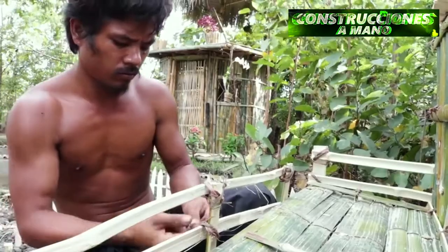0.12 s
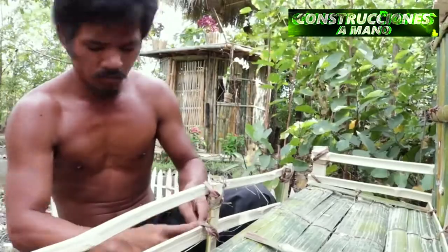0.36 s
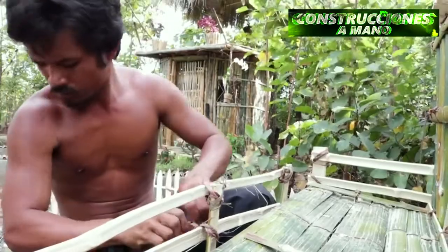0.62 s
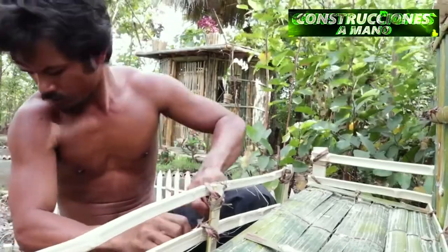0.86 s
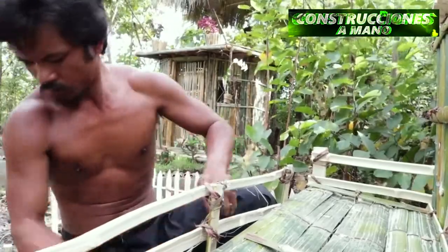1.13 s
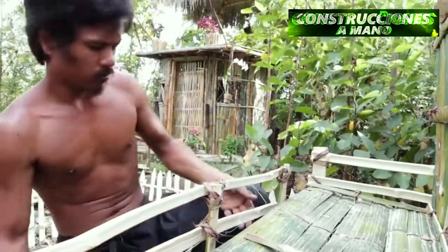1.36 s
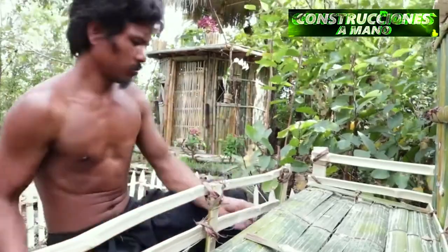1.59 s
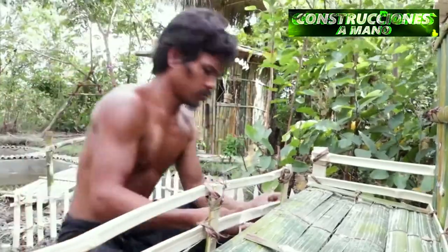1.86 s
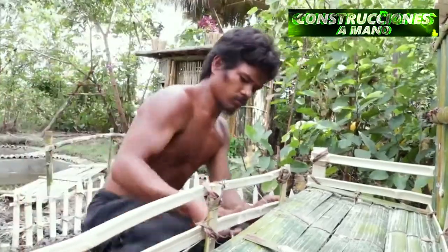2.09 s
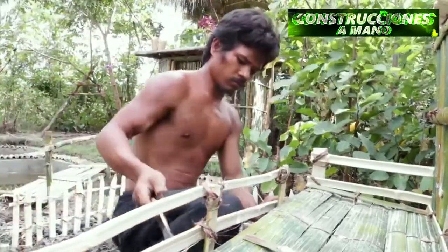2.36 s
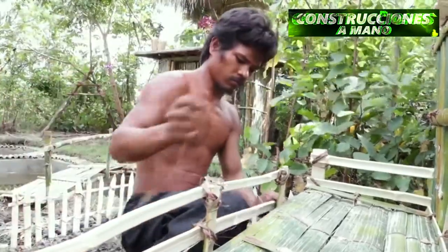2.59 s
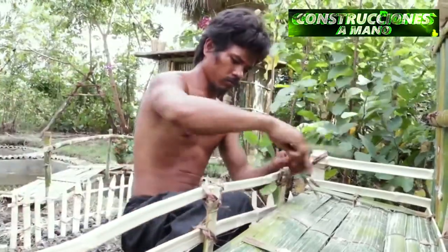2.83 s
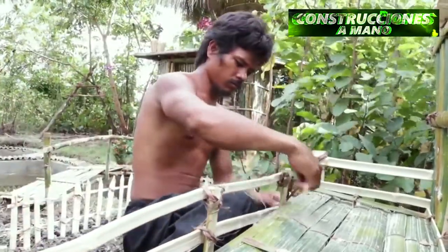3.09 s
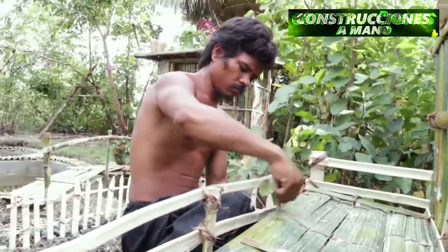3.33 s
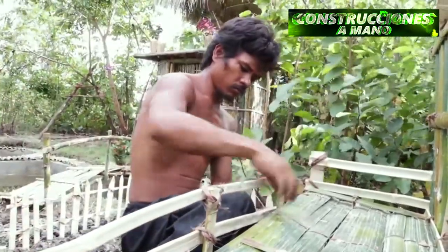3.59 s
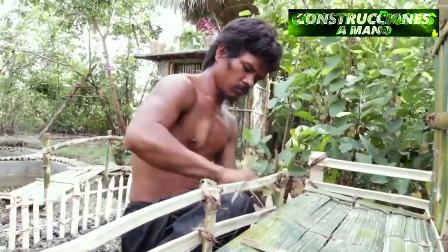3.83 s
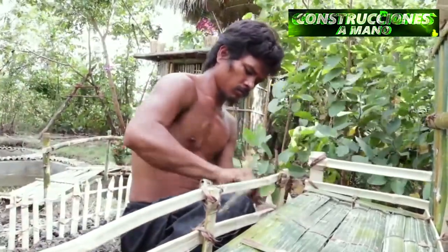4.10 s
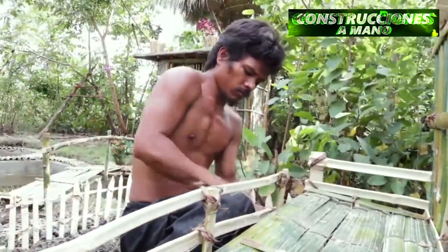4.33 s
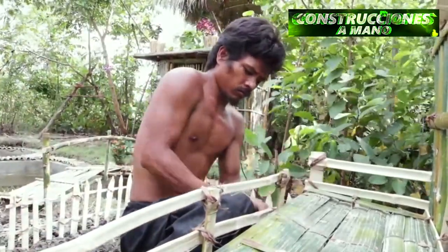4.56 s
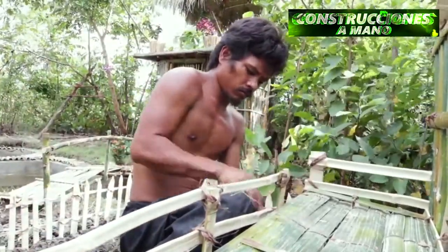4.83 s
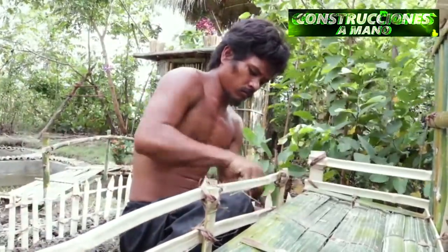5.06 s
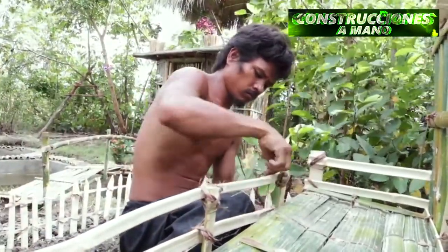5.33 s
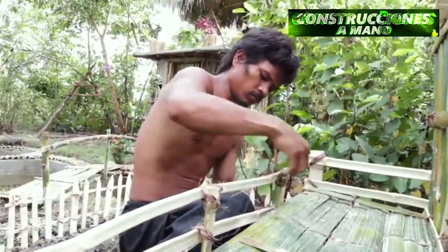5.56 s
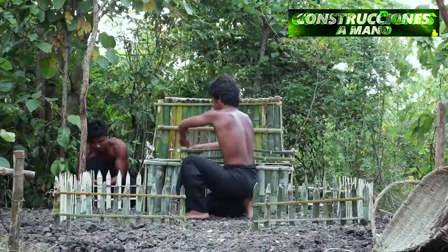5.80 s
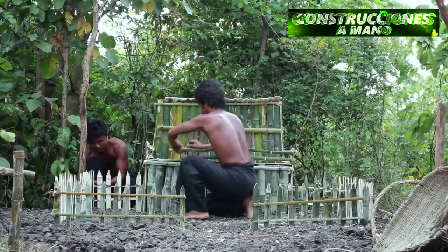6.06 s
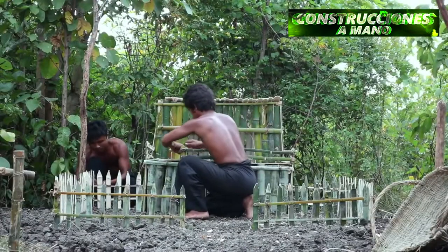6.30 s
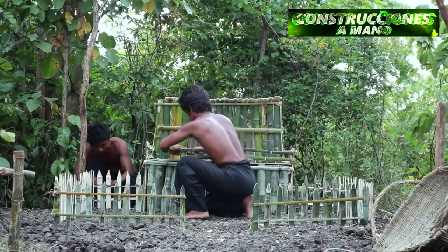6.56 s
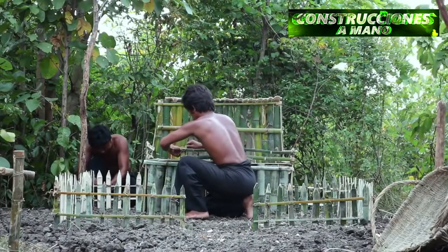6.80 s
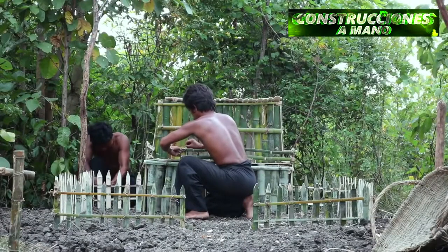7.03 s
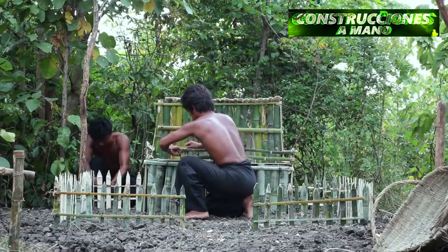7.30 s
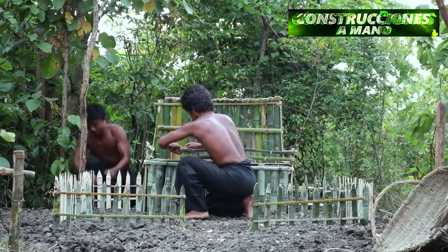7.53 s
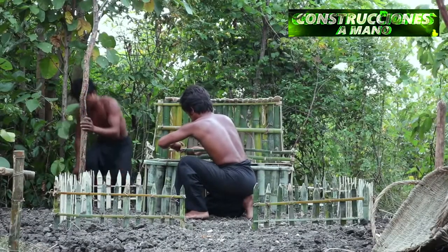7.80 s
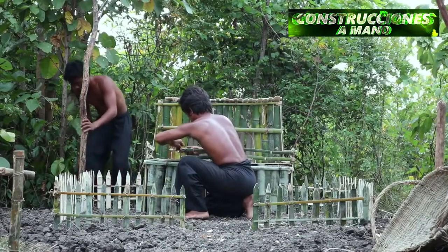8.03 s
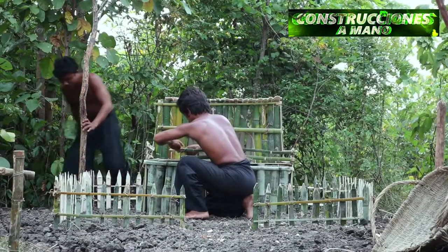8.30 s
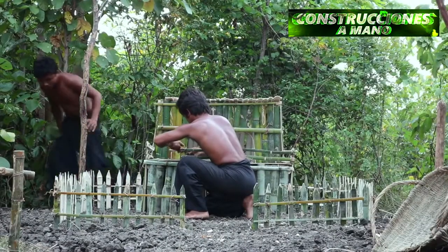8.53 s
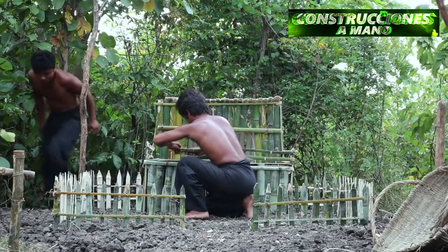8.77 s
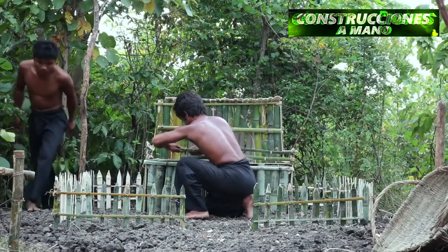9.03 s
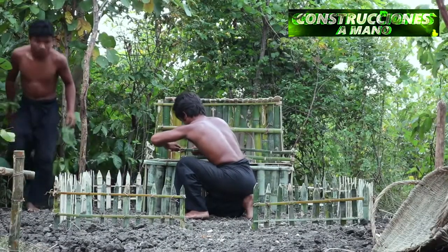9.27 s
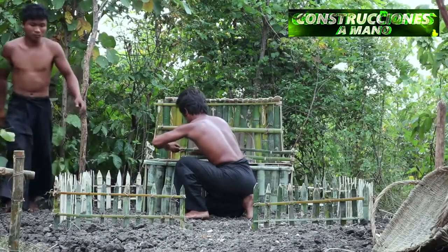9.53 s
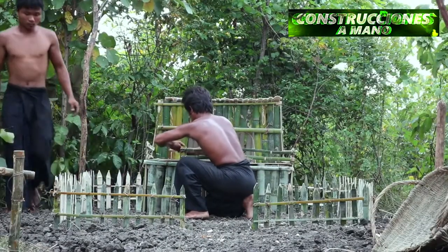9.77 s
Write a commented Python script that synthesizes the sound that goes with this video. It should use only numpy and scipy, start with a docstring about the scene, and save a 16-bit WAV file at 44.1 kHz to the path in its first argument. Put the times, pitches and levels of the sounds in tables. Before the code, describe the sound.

A clear, short bird whistle starts at once above a smooth, low, distant roar that lasts throughout. Sharp two-part chirps follow, with a dull bamboo knock near 0.2 s and downward swoops around 0.6 s. At about 0.9 s a rapid dry buzz sounds, then a falling trill at 1.2 s and small low dipping notes until 2 s. From 2 to 3.5 s it is sparser, with faint leaf rustles. Far echoing twitters thicken from 3.5 to 5.3 s, including thin high notes. A faint knock comes at 6.5 s. From 7 s birds grow busy again: bright hooks, a swoop, another knock at 8.3 s, a second buzz at 8.2 s and trill at 8.5 s. A thin steady note follows at 8.9 s, then tiny metal tinkles at 9.3 and 9.5 s among lively chirps. Soft wind bumps the microphone, notably near 0.7 and 5.8 s.

```python
"""A clear bird whistle comes first, over a far-off low roar, and soon many small birds sing round a forest clearing.
Each bird note is a near-pure tone with a faint octave; the deep ones are blurred by echoes, which are fading noise.
Two people work quietly nearby: dry leaves rustle (clicks), bamboo is knocked (thuds), metal tinkles (ringing tones).
Further birds twitter at random, the roar is shaped noise, and a light wind buffets the microphone below clear pitch."""
import sys
import numpy as np
from scipy import signal
from scipy.fft import rfft, irfft
from scipy.io import wavfile
from scipy.ndimage import uniform_filter1d, map_coordinates

SR = 44100
rng = np.random.default_rng(int(sys.argv[2]) if len(sys.argv) > 2 else 0)


def int16_out(signal):
    """Quantize to a 16-bit WAV file."""
    q = np.round(np.clip(np.atleast_2d(signal).T, -1, 1) * 32767)
    wavfile.write(sys.argv[1], SR, q.astype(np.int16))


def rack_gain(trim_db):
    """Turn a fader trim in dB into the linear factor to multiply a signal by."""
    fader = np.asarray(trim_db, float)
    return 10 ** (fader / 20)


N = 436149  # length of the scene in samples

# Levels in the tables are starting levels: breath, flicker, echo and the mix act on them later.
# Far roar, shape of its noise: (frequency [Hz], relative level [dB])
ROAR_SPECTRUM = [(25, -44), (50, 0), (255, -3.5), (590, -11.5), (850, -14), (1400, -24), (2200, -35),
                 (3500, -34.5), (5500, -41.5), (9000, -46.5), (13500, -51.5)]
# Slow change of the roar: (time [s], level [dB])
ROAR_SWELL = [(0, -36.5), (6.8, -35.5)]
# Wind buffets, shape of their noise: (frequency [Hz], relative level [dB])
WIND_SPECTRUM = [(3, -2.5), (15, 3), (33, -13), (65, -27), (400, -110)]
# Wind coming and going: (time [s], level [dB])
WIND_LEVELS = [(0, -22), (.5, -28.5), (.62, -10), (1.0, -13.5), (1.2, -26.5), (1.8, -40), (2.0, -20.5),
               (2.2, -37.5), (2.45, -18.5), (3.4, -20), (5.5, -22), (5.8, -12), (6.0, -27), (7.2, -31),
               (9.89, -37)]

# Hoarse far chatter: (start [s], length [s], first pitch [Hz], last pitch [Hz], level [dB])
CHATTER = [(0.435, 0.1, 5500, 6270, -45), (3.152, 0.069, 6200, 4500, -51), (5.258, .05, 5400, 6200, -47),
           (6.66, 0.024, 5600, 6180, -47.5), (8.67, 0.06, 6500, 5280, -47), (9.46, 0.051, 5600, 6050, -51)]
# Shape of a two-voiced churr: (time from start [s], pitch [Hz])
CHURR = [(0, 6170), (.027, 8060), (0.088, 7300), (0.144, 4860)]
# Calls of the churr: (start [s], level [dB])
CHURR_CALLS = [(2.885, -52.5), (3.056, -58)]
HOARSE = 0.055  # typical pitch shake in hoarse notes, as a share of the pitch

# Leaf rustles: (start [s], fading time [s], level [dB], guide frequency of the band [Hz])
RUSTLES = [(2.27, 0.044, -60, 5030), (2.66, 0.023, -53, 4960), (3.277, 0.046, -49, 4300),
           (4.27, 0.11, -63, 8400), (7.07, 0.03, -55, 2250), (7.773, 0.16, -59, 6700)]
CRISP_DB = 3.2  # spread of click sizes in a rustle [dB]
# Dull knocks on bamboo: (start [s], level [dB])
KNOCKS = [(0.179, -37.5), (6.484, -45), (8.299, -40.5)]
KNOCK_LOW_HZ, KNOCK_HIGH_HZ, KNOCK_FADE_S = 400, 2600, 0.03  # the body's band and fading time
# Ringing tones of the small metal piece: (frequency [Hz], relative level [dB], time to fall 60 dB [s])
METAL_MODES = [(8800, -6, 0.16), (10050, -10, 0.15), (11300, -8, 0.14), (12670, -1, 0.1), (13040, -6, 0.13)]
# Tinkles of the metal: (start [s], level [dB])
TINKLES = [(9.314, -43), (9.54, -52)]

# Buzzes, tiny falls in quick succession: (start [s], length [s], level [dB])
BUZZES = [(0.889, 0.24, -34), (8.197, .22, -34)]
BUZZ_RATE_HZ = 125  # average number of strokes per second
BUZZ_TOP_HZ, BUZZ_LOW_HZ = 5500, 3400  # pitch range of a stroke at the start of a buzz

# First part of a call, a peaked chip: (time from the chip's peak [s], pitch [Hz])
CHIP = [(-.019, 3900), (0, 5410), (0.019, 3600)]
# Second part, a short upstroke: (time from the chip's peak [s], pitch [Hz])
UPSTROKE = [(.071, 3212), (0.098, 4510), (0.111, 3460)]
# Two-part calls: (chip peak time [s], chip level [dB], upstroke level [dB])
CHIP_CALLS = [(0.107, -40, -37), (0.748, -33, -35), (1.666, -43, -46), (2.333, -45, -49),
              (4.083, -43.5, -42), (4.712, -43, -48), (5.72, -45.5, -50.5), (6.474, -41, -43.5),
              (7.241, -37.5, -45.5), (7.97, -36, -40)]
# Steep fall repeated in a trill: (time from start [s], pitch [Hz])
FALL = [(0, 6800), (0.031, 3200)]
# Notes of the trills: (start [s], level [dB])
TRILL = [(1.195, -43.5), (1.253, -42), (1.312, -46.5), (1.367, -49), (1.436, -51), (8.47, -40.5),
         (8.522, -39.5), (8.577, -45.5), (8.638, -44.5)]

# Depth among the trees: 0 close, 1 near, 2 far and beyond.
# Typical pitch trembling at depths 0, 1 and 2: (share of the pitch)
TREMBLE = (0.004, 0.01, 0.027)
# Straight slides and held notes: (start [s], length [s], first pitch [Hz], last pitch [Hz], level [dB], depth)
SLIDES = [(0.049, 0.12, 3660, 3420, -39, 0.13), (0.062, 0.03, 3190, 2340, -49, 1.9),
          (0.144, 0.096, 5900, 7060, -58, 1.55), (0.245, 0.073, 4900, 3750, -37.5, .3),
          (0.555, 0.051, 4900, 4940, -52, 0.76), (0.93, 0.048, 3470, 2705, -39.5, 1.8),
          (1.392, .025, 3010, 2350, -62, 0.44), (1.751, .024, 2900, 2280, -62, 0.54),
          (2.589, 0.026, 2690, 2830, -55, 0.091), (2.843, 0.037, 3140, 3100, -62, 0.11),
          (3.524, 0.067, 4730, 3970, -60, 2.3), (3.299, 0.023, 3300, 4690, -49, 1.4),
          (3.624, 0.031, 3670, 2270, -49.5, 2.6), (3.66, 0.062, 3170, 2290, -44, 1.4),
          (3.854, 0.058, 3700, 3610, -52.5, 1.2), (3.99, 0.087, 3590, 3980, -49, 1.6),
          (4.091, 0.039, 2030, 3280, -47, 2.03), (4.119, 0.028, 3210, 4440, -47, 2.2),
          (4.149, 0.022, 6030, 7040, -50.5, 1.4), (4.279, 0.049, 4700, 7450, -57, 1.5),
          (4.305, 0.047, 5370, 6200, -63, 1.2), (4.32, 0.062, 4250, 4490, -51.5, 1.4),
          (4.289, 0.037, 2820, 3555, -46.5, 1.7), (4.557, 0.22, 5970, 5960, -54, 1.65),
          (4.691, 0.053, 1926, 2360, -48.5, 1.8), (4.72, 0.042, 8600, 8500, -57.5, 1.1),
          (4.766, 0.045, 8550, 7800, -57, 1.4), (4.79, 0.041, 7600, 7700, -55, 1.4),
          (5.197, 0.027, 2760, 1910, -51, 2.4), (5.205, 0.033, 3440, 2734, -45.5, 1.8),
          (5.942, 0.06, 3470, 2700, -63, 1.2), (6.114, 0.085, 5860, 4250, -60, 1.3),
          (6.115, 0.081, 3730, 3650, -53, 2), (6.383, 0.091, 5260, 5100, -61, 0.072),
          (6.659, 0.041, 2320, 4310, -54, 0.88), (6.686, .04, 7900, 8250, -56, 1.4),
          (6.691, 0.054, 3990, 4080, -43, 1.45), (7.369, 0.099, 3710, 3400, -45.5, 0.37),
          (7.437, 0.081, 3615, 3660, -53, 0.8), (7.549, 0.083, 5170, 3450, -42.5, 1),
          (7.826, 0.031, 2810, 4730, -52, 0.49), (7.853, 0.041, 4520, 4060, -40.5, 1.5),
          (7.878, 0.11, 4090, 4500, -43.5, 1.2), (8.009, 0.024, 6700, 7300, -56, 1.3),
          (8.04, 0.1, 6750, 5600, -57, 1.3), (8.149, 0.072, 3070, 2274, -49, 2.4),
          (8.188, 0.056, 3260, 2485, -44.5, 1.14), (8.681, 0.038, 3700, 2620, -45, 1),
          (8.693, 0.096, 3560, 4010, -49.5, 1.2), (8.728, 0.089, 1934, 2824, -48, 1.56),
          (8.901, 0.06, 2680, 2720, -54, 0.74), (8.882, 0.026, 3740, 4520, -47, 2),
          (8.992, 0.039, 3420, 2680, -51.5, 1.7), (9.2, 0.034, 3690, 3870, -41.5, 2.3),
          (9.296, 0.042, 4440, 3944, -38.5, 1), (9.439, 0.11, 2360, 2480, -57, 0),
          (9.484, 0.04, 4300, 5250, -46, 1.77), (9.511, .05, 4310, 2440, -43.5, 1.8),
          (9.583, 0.025, 3310, 4640, -49, 1.8), (9.56, 0.13, 2500, 2376, -49.5, 2.07)]
# Hooks leap at once, then settle: (start [s], length [s], first pitch [Hz], settling pitch [Hz], level [dB], depth)
HOOKS = [(0.125, 0.045, 3690, 2850, -41, 1.1), (0.298, 0.073, 4100, 2690, -51, 0.65),
         (0.996, 0.058, 7600, 4750, -37, 0.058), (2.93, 0.055, 7100, 4930, -54, 0),
         (3.941, 0.056, 3140, 4410, -52.5, 2), (4.087, 0.038, 7700, 5250, -47, 2.04),
         (5.138, 0.073, 5700, 2820, -43, 1.24), (5.325, 0.064, 8750, 4960, -40.5, 0.46),
         (7.144, 0.056, 6770, 5090, -44, 1), (7.534, 0.057, 8300, 4990, -40, 0),
         (9.163, 0.044, 4800, 2910, -40, 1.9), (9.272, 0.054, 3600, 4750, -35.5, 1.23)]
HOOK_SETTLE = .19  # settling time constant as a share of the length
# Arches rise to a top and fall back: (start [s], length [s], foot pitch [Hz], top pitch [Hz], level [dB], depth)
ARCHES = [(0.172, 0.041, 3410, 4370, -47, 1.7), (2.61, 0.078, 2980, 4900, -56.5, 0.24),
          (2.614, 0.061, 3280, 4000, -56, 0.31), (3.2, 0.047, 3640, 4530, -51, 1.4),
          (5.309, 0.07, 3590, 4370, -54, 0.2), (8.779, 0.042, 3970, 5190, -44.5, 2)]
# Shape of a low dip: (time from start [s], pitch [Hz])
LOW_DIP = [(0, 2357), (.029, 1990), (.035, 2074), (.05, 2650)]
# A second, flatter voice under the bottom of the dip: (time from the dip's start [s], pitch [Hz])
UNDERTONE = [(.018, 1780), (.042, 1850)]
# Calls of the low dip: (start [s], dip level [dB], undertone level [dB])
LOW_DIP_CALLS = [(.962, -55, -64), (1.066, -47, -46), (1.182, -54, -56), (1.409, -50, -55),
                 (1.523, -55, -50), (1.772, -51, -47), (1.905, -51, -54)]
# Shapes of the other repeated motifs, each: (time from start [s], pitch [Hz])
RISE = [(0, 3810), (.055, 4263), (.113, 4310)]
SWOOP = [(0, 6590), (.04, 6320), (.12, 4560), (.165, 3850), (.222, 3430)]
VEE = [(0, 7350), (.012, 6280), (.054, 5420), (.089, 6900)]
SCOOP = [(0, 3800), (.035, 2342), (.071, 2600)]
LONG_FALL = [(0, 3660), (.07, 4260), (.128, 3620), (.158, 2810), (.27, 2190)]
# Their calls, each: (start [s], level [dB])
RISE_CALLS = [(0.421, -36), (7.741, -37.5)]
SWOOP_CALLS = [(0.612, -38.5), (7.922, -39.5)]
VEE_CALLS = [(8.802, -51), (9.093, -51)]
SCOOP_CALLS = [(0.486, -44.5), (4.177, -51.5), (4.607, -47)]
LONG_FALL_CALLS = [(.532, -50)]
# Thin steady notes with a clear octave: (start [s], length [s], level [dB])
STEADY = [(1.142, 0.15, -48.5), (8.91, 0.31, -49)]
STEADY_HZ, STEADY_OCTAVE_DB = 4250, -17  # pitch, and octave relative to it
SWELL = .32  # the smaller, the more abruptly a note starts and stops


def walk(rate):
    """Random wandering: values held for 1 / rate seconds and smoothed twice, with a spread near 1."""
    hold = int(SR / rate)
    held = rng.standard_normal(N // 100)[np.arange(N) // hold]
    return 1.595 * uniform_filter1d(uniform_filter1d(held, hold), hold)


def unit(x):
    """Scale a sound to an rms strength of 1."""
    return x / np.sqrt(np.mean(x ** 2))


def band(x, low_hz, high_hz, order=2):
    """Keep the frequencies between two limits."""
    limits = [low_hz, min(high_hz, .45 * SR)]
    return signal.sosfilt(signal.butter(order, limits, "band", fs=SR, output="sos"), x)


def add(track, start_s, sound):
    """Mix a sound into a track at a given time."""
    i = int(start_s * SR)
    track[..., i:i + sound.shape[-1]] += sound[..., :N - i]


def coloured(points):
    """Noise with a given balance of frequencies, rms 1."""
    hz, db = np.transpose(points)
    bins = np.arange(N // 2 + 1) * SR / N + 1
    gain = rack_gain(np.interp(np.log(bins), np.log(hz), db))
    return unit(irfft(rfft(rng.standard_normal(N)) * gain, N))


def curve(rows):
    """Turn a table of levels into a gain that changes over time."""
    s, db = np.transpose(rows)
    return rack_gain(np.interp(np.arange(N) / SR, s, db))


def voice(hz, db, overtone_db=-42):
    """The syrinx, a bird's voice organ: a near sine with a weaker octave."""
    phase = 2 * np.pi * np.cumsum(hz) / SR
    tone = np.sin(phase) + rack_gain(overtone_db) * np.sin(2 * phase)
    return np.sqrt(2) * rack_gain(db) * tone


def whistle(track, db, s, hz, tremble, place=0.5, overtone_db=-39, slide=4.8):
    """One note: the pitch rounds its turns and trembles, the breath swells and fades."""
    t = np.arange(s[0], s[-1], 1 / SR)
    log_pitch = np.interp(t, s, np.log(hz))
    tune = uniform_filter1d(log_pitch, len(t) // 8 + 1, mode="nearest")
    # fast slides take more breath than held notes; a larger slide value weakens this
    push = (1 + np.abs(np.gradient(tune)) * SR / slide) ** 0.38
    pitch = np.exp(tune + tremble[int(s[0] * SR):][:len(t)])
    breath = push * np.hanning(len(t)) ** SWELL
    add(track, s[0], place * voice(pitch, db, overtone_db) * breath)


def trunks(x, early_s, early_db, late_s, late_db):
    """Scattering: near branches give a short smear, countless trunks a long tail that loses its treble first."""
    t = np.arange(int(1.5 * SR)) / SR
    early, late = rng.standard_normal((2, len(t)))
    early = early * rack_gain(-60 * t / early_s)
    late = late * (1 - np.exp(-t / 0.007))
    middle = band(late, 2100, 4040, order=1) * rack_gain(-60 * t / late_s)
    treble = band(late, 5400, 13000, order=1) * rack_gain(-60 * t / (0.38 * late_s))
    tail = rack_gain(early_db) * unit(early) + rack_gain(late_db) * unit(middle + treble)
    return signal.fftconvolve(x, tail / np.sqrt(len(t)))[:N]


def roar():
    """Smooth distant noise, heavy in the bass, swelling a little."""
    return coloured(ROAR_SPECTRUM) * curve(ROAR_SWELL) * rack_gain(.5 * walk(1.295))


def wind():
    """Slow pressure swings at the microphone, rising and falling with the gusts."""
    return coloured(WIND_SPECTRUM) * curve(WIND_LEVELS)


def chorus(count=70):
    """Unseen birds far away: short slides at random moments and pitches."""
    track, tremble = np.zeros(N), 0.028 * walk(400)
    for when, length, pitch, slide, size in rng.random((count, 5)):
        start = when * (N / SR - .2)
        s = np.array([start, start + 0.0254 + 0.04 * length])
        first_hz = 2600 * 2 ** (1.1 * pitch)
        last_hz = first_hz * 2 ** (.2 - 0.73 * slide)
        whistle(track, -69 + 9 * size, s, [first_hz, last_hz], tremble)
    return track


def chatterers():
    """Distant hoarse notes whose pitch shakes widely."""
    track, tremble = np.zeros(N), HOARSE * walk(400)
    for s, length, first_hz, last_hz, db in CHATTER:
        whistle(track, db, [s, s + length], [first_hz, last_hz], tremble)
    dt, hz = np.transpose(CHURR)
    for s, db in CHURR_CALLS:
        # both sides of the syrinx sound, each with its own trembling
        whistle(track, db, s + dt, hz, tremble)
        whistle(track, db, s + dt, hz * .78, tremble[::-1])
    return track


def rustles(track, t):
    """Dry leaves: fading showers of uneven clicks."""
    for s, fade, db, hz in RUSTLES:
        clicks = rng.standard_normal(len(t)) * rack_gain(CRISP_DB * rng.exponential(size=len(t)))
        shower = unit(band(clicks, hz / 2, hz * 1.3))
        shape = np.minimum(t / 0.0024, 1) * np.exp(-(t / fade) ** 2)
        add(track, s, rack_gain(db) * shower * shape)


def knocks(track, t):
    """Bamboo: short broad thuds with a quick start and a smooth fade."""
    for s, db in KNOCKS:
        body = unit(band(rng.standard_normal(len(t)), KNOCK_LOW_HZ, KNOCK_HIGH_HZ))
        shape = np.minimum(t / 0.001, 1) * np.exp(-t / KNOCK_FADE_S)
        add(track, s, rack_gain(db) * body * shape)


def tinkles(track, t):
    """Metal: several fixed tones ring and fade together."""
    ring = sum(rack_gain(db - 60 * t / t60) * np.sin(2 * np.pi * hz * t) for hz, db, t60 in METAL_MODES)
    for s, db in TINKLES:
        add(track, s, rack_gain(db) * ring * np.minimum(t / 0.024, 1) ** 2)


def handling():
    """The quiet work of the two people: leaves, bamboo and metal together."""
    track, t = np.zeros(N), np.arange(SR // 4) / SR
    rustles(track, t)
    knocks(track, t)
    tinkles(track, t)
    return track


def buzzer():
    """Each stroke of the buzz slides down, loudest near its top; the buzz tires towards its end."""
    track = np.zeros(N)
    for s, length, db in BUZZES:
        t = np.arange(int(length * SR)) / SR
        rate = BUZZ_RATE_HZ * (1 + 0.06 * walk(55)[:len(t)])
        stroke = np.cumsum(rate / SR) % 1  # runs from 0 to 1 in each stroke
        puff = np.sin(np.pi * stroke ** 0.66) ** 2
        pitch = BUZZ_TOP_HZ + (BUZZ_LOW_HZ - BUZZ_TOP_HZ) * stroke ** 2
        pitch = pitch * (1 - 0.03 * t / length)
        tiring = np.minimum(t / 0.01, 1) * rack_gain(-8 * (t / length) ** 2)
        add(track, s, voice(pitch, db) * puff * tiring)
    return track


def callers():
    """Repeated whistled shapes, each time a little off in pitch."""
    track, tremble = np.zeros(N), 0.015 * walk(400)
    calls = [(s, db, CHIP) for s, db, _ in CHIP_CALLS]
    calls += [(s, db, UPSTROKE) for s, _, db in CHIP_CALLS]
    calls += [(s, db, FALL) for s, db in TRILL]
    for s, db, shape in calls:
        dt, hz = np.transpose(shape)
        whistle(track, db, s + dt, hz * (1 + 0.0105 * rng.standard_normal()), tremble)
    return track


def singers():
    """The listed songs as whistled notes, shared between close, near and far groups by their depth."""
    groups, tremble, places = np.zeros((3, N)), walk(400), np.arange(3)
    share = np.linspace(0, 1, 12)  # points along a note
    notes = []  # (start, times from start, pitches, level, depth, slide)
    for s, length, a, b, db, depth in SLIDES:
        notes.append((s, length * share, a * (b / a) ** share, db, depth, 4.0))
    for s, length, foot, top, db, depth in ARCHES:
        notes.append((s, length * share, foot + (top - foot) * np.sin(np.pi * share), db, depth, 4.0))
    dips = [(s, db) for s, db, _ in LOW_DIP_CALLS]
    undertones = [(s, db) for s, _, db in LOW_DIP_CALLS]
    motifs = [(LOW_DIP, dips, .1), (UNDERTONE, undertones, .1), (LONG_FALL, LONG_FALL_CALLS, .9),
              (RISE, RISE_CALLS, .2), (SWOOP, SWOOP_CALLS, .45), (VEE, VEE_CALLS, 1.0),
              (SCOOP, SCOOP_CALLS, 1.95)]  # (shape, calls, depth)
    for shape, calls, depth in motifs:
        notes += [(s, *np.transpose(shape), db, depth, 4.0) for s, db in calls]
    for s, length, a, b, db, depth in HOOKS:
        hz = b + (a - b) * np.exp(-share / HOOK_SETTLE)
        notes.append((s, length * share, hz, db, depth, 13))  # hooks gain little breath from their leap
    for s, dt, hz, db, depth, slide in notes:
        place = np.clip(1 - np.abs(np.clip(depth, 0, 2) - places), 0, 1)[:, None]
        shake = np.interp(depth, places, TREMBLE) * tremble
        whistle(groups, db, s + dt, hz, shake, place, slide=slide)
    for s, length, db in STEADY:
        whistle(groups[0], db, [s, s + length], [STEADY_HZ] * 2, .0015 * tremble,
                overtone_db=STEADY_OCTAVE_DB)
    return groups


def scene():
    """Echo takes a larger part deeper in the trees; paths through moving leaves make the sound flicker."""
    close, near, far = singers()
    close = close * rack_gain(3.6 * walk(90)) + handling()
    buzz = buzzer()
    near = (near + callers()) * rack_gain(2.3 * walk(90))
    far = (far + chorus() + chatterers()) * rack_gain(1.0 * walk(120))
    # near smear: fading time [s], level [dB]; then long tail: fading time [s], level [dB]
    woods = trunks(close, .04, -5, 0.87, -6.5)
    woods += trunks(near, .06, 0., 0.99, -3.9)
    woods += trunks(far, 0.13, -0.91, 1.0, -2.5)
    woods += trunks(buzz, .08, -6, .7, -3)
    # swaying leaves keep changing the path length by a few samples, which blurs the pitch of the echoes
    woods = map_coordinates(woods, [np.arange(N) + 1.6 * walk(200)], order=3, mode="nearest")
    direct = rack_gain(1.92) * (close + near) + rack_gain(-2.0) * far + buzz
    return (direct + woods + roar() + wind())[None]


def top_cut(x):
    """Nothing passes above the cut-off."""
    return signal.sosfilt(signal.butter(12, 13600, fs=SR, output="sos"), x)


def record(dry):
    """Turn the finished mix of the clearing into the sound that is kept."""
    return top_cut(dry)


dry = scene()
out = record(dry)
int16_out(out)
```